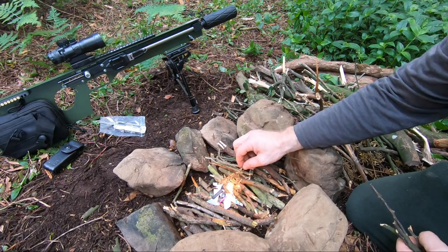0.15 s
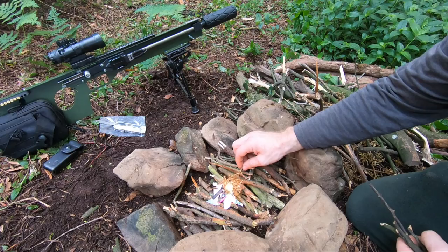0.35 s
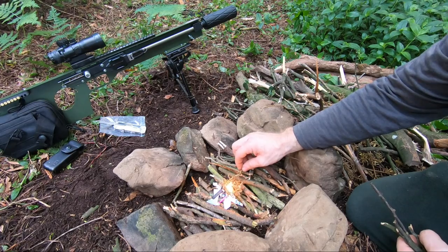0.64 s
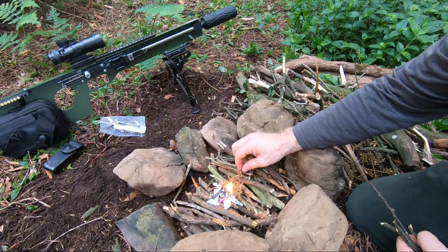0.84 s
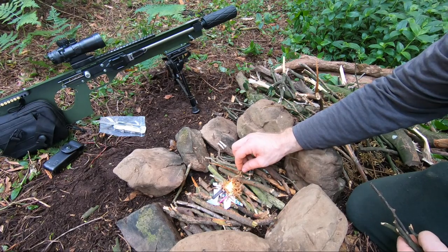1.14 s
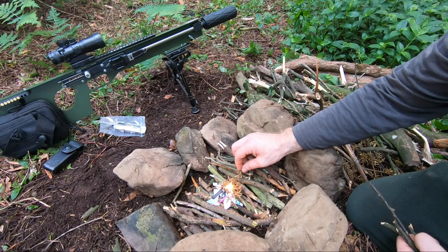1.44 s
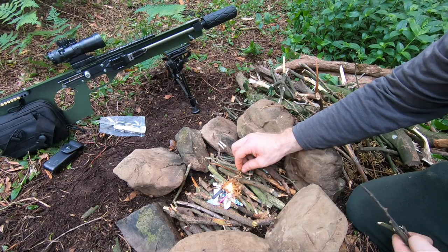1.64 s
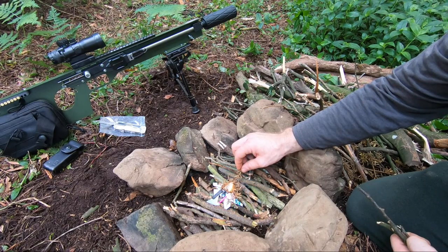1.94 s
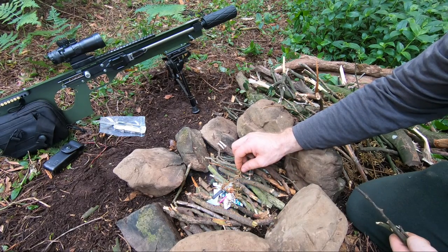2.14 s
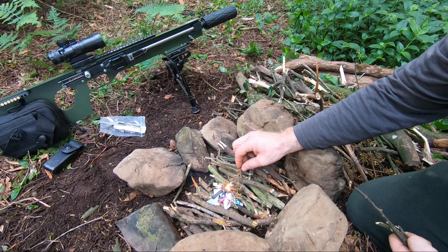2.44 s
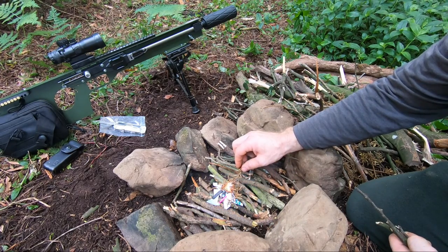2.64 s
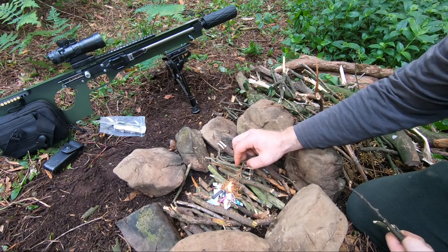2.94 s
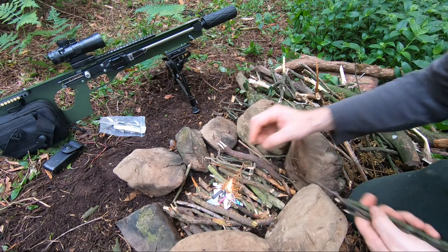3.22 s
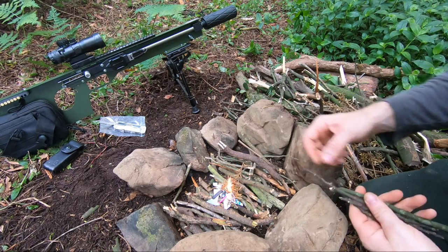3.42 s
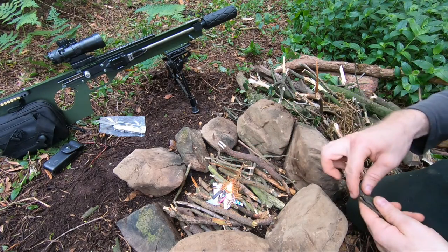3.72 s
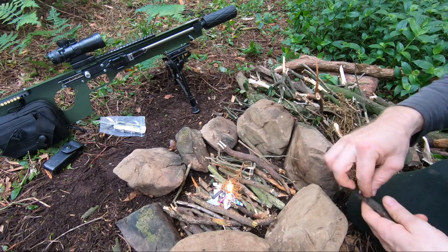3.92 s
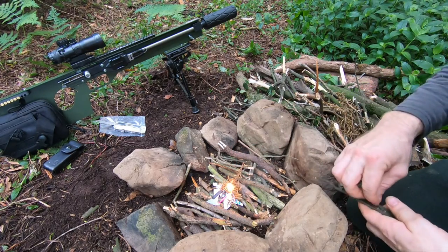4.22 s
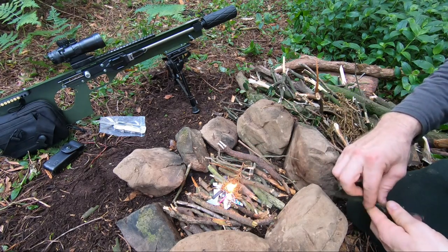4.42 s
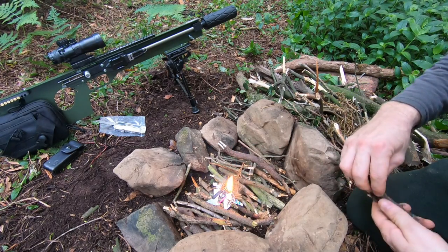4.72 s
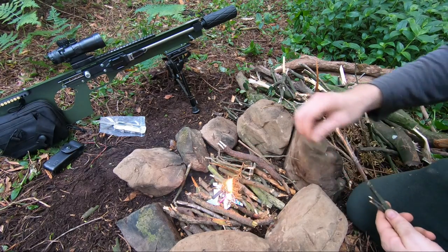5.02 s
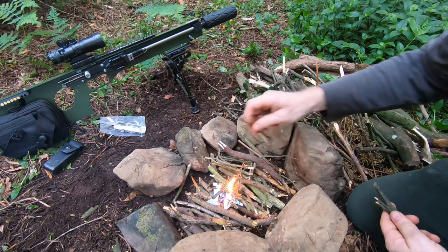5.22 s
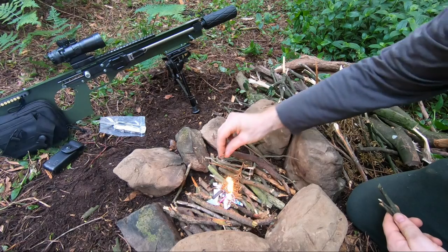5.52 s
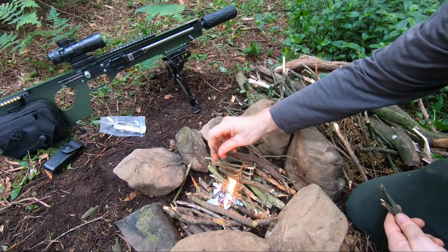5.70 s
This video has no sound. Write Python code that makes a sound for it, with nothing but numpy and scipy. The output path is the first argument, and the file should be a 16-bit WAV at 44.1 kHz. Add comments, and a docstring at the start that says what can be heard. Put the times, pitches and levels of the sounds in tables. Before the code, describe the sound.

In a quiet wood, leaves hush faintly and small birds whistle far off. Near the microphone, a handful of bright, sharp snaps comes from dry kindling at uneven intervals. The cracking then stops, leaving the soft flutter of a small fire, a brief sleeve swish and a few light ticks and rubs as fingers work a twig.

```python
"""A small, freshly lit fire in a ring of stones, close by, among trees.
From the start leaves hush, small birds whistle far off and pockets of gas catch in soft puffs.
From 0.3 to 2.2 s thin dry sticks crack sharply: fibres part, the wood rings, stones scatter the treble.
From 3.3 s two hands handle a twig, with light ticks, bark rustles and the swish of a sleeve,
while the flames, birds and leaves go on."""
import sys
import numpy as np
from scipy import signal
from scipy.fft import rfft, irfft
from scipy.io import wavfile
from scipy.ndimage import uniform_filter1d

SR = 44100
rng = np.random.default_rng(int(sys.argv[2]) if len(sys.argv) > 2 else 0)


def generate_wav(sig):
    """Save sig (samples, or channels by samples) to the path in sys.argv[1] as 16-bit PCM at SR."""
    pcm = np.round(np.clip(np.atleast_2d(sig).T, -1, 1) * 32767).astype(np.int16)
    wavfile.write(sys.argv[1], SR, pcm)


N = 258426
T = np.arange(N) / SR


def undb(db):
    """Decibels to gain."""
    return 10 ** (np.asarray(db) / 20)


def add(out, time_s, x):
    """Mix x into out from time_s."""
    i = max(int(time_s * SR), 0)
    out[i:i + len(x)] += x[:N - i]


def band(x, hz, width_hz):
    """One resonance, gain 1 at its centre; width capped at SR / 4."""
    hz = min(hz, SR * .45)
    return signal.lfilter(*signal.iirpeak(hz, hz / min(width_hz, SR / 4), fs=SR), x)


def reflections(t60_s, size=2048):
    """Dense reflections of unit energy, fading 60 dB in t60_s."""
    tail = rng.standard_normal(size) * np.exp(-np.log(1000) * T[:size] / t60_s)
    return tail / np.sqrt(np.sum(tail ** 2))


def wander(rate_hz):
    """Smooth random wander, spread 1."""
    hold = int(SR / rate_hz)
    steps = np.repeat(rng.standard_normal(N // hold + 2), hold)
    smooth = uniform_filter1d(uniform_filter1d(steps, hold), hold)[:N]
    return smooth / smooth.std()


def swells(rows):
    """Envelope of bell-shaped rises and falls."""
    return sum(undb(db) * np.exp(-2 * ((T - mid_s) / length_s) ** 2) for mid_s, length_s, db in rows)


def resonate(modes, size=2048, low_cut_hz=70):
    """Minimum-phase response of steep resonances whose powers add."""
    f = np.arange(size // 2 + 1) * SR / size
    power = sum(undb(db) ** 2 / (1 + (2 * (f - hz) / width_hz) ** 2) ** 2 for hz, width_hz, db in modes)
    low_cut = (f + 1) ** 2 / (f ** 2 + low_cut_hz ** 2)
    cepstrum = irfft(np.log(power * low_cut) / 2)
    cepstrum[1:size // 2] *= 2
    cepstrum[size // 2 + 1:] = 0
    return irfft(np.exp(rfft(cepstrum)))


def tree_echo(x, t60_s):
    """Trunks and leaves return a diffuse echo."""
    return signal.fftconvolve(x, reflections(t60_s, size=65536))[:N]


# Hush spectrum: (frequency [Hz], relative density [dB])
HUSH_SPECTRUM = [(30, -19.5), (45, -18), (75, -17), (126, -17.5), (200, -19), (370, -25), (600, -27.5),
                 (970, -24), (1200, -25), (1500, -28.5), (3200, -29), (4200, -33.5), (5740, -39),
                 (9000, -42.5), (15500, -44.5)]
def leaves(level_db=-67, breeze_db=.4, flicker_db=.25):
    """Distant leaves swell and flicker gently with the breeze."""
    hz, db = np.transpose(HUSH_SPECTRUM)
    bins_hz = np.maximum(np.arange(N // 2 + 1) * SR / N, 1)
    colour = undb(np.interp(np.log(bins_hz), np.log(hz), db))
    hush = irfft(rfft(rng.standard_normal(N)) * colour, N)
    hush /= np.sqrt(np.mean(colour ** 2 * (bins_hz > 100)))
    swell = undb(breeze_db * wander(1.5) + flicker_db * wander(6))
    return undb(level_db) * (hush + band(hush, 1800, 4000) * (swell - 1))


# Gusts: (centre [s], length [s], level [dB])
GUSTS = [(2.4, .7, -56.5), (3.68, .15, -57)]
def air(steady_db=-60):
    """Slow air presses on the microphone."""
    pressure = band(band(rng.standard_normal(N), 5, 7), 5, 7)
    return (undb(steady_db) + swells(GUSTS)) * pressure / pressure.std()


def whistles(notes, bend):
    """Nearly pure notes that glide, trill and fade in and out."""
    out, waver = np.zeros(N), wander(300)
    for time_s, length_s, start_hz, end_hz, db, trill in notes:
        progress = np.linspace(0, 1, int(length_s * SR))
        glide_hz = start_hz + (end_hz - start_hz) * progress ** bend
        hz = glide_hz * (1 + trill * np.roll(waver, -int(time_s * SR))[:len(progress)])
        fade = np.sqrt(2 * np.abs(np.sin(np.pi * progress)))
        add(out, time_s, undb(db) * fade * np.sin(2 * np.pi * np.cumsum(hz) / SR))
    return out


def chorus_notes(count=40, low_hz=2450, range_hz=1500, gain_db=-81.5):
    """Scraps of song from deep in the wood, at loose intervals."""
    notes = []
    for k, (when, length, pitch, glide) in enumerate(rng.random((count, 4))):
        time_s = (k + when) / count * N / SR
        hz = low_hz + range_hz * pitch
        notes.append((time_s, .06 + .14 * length, hz, hz * (1 + .2 * glide), gain_db, .03))
    return notes


# Far notes: (time [s], length [s], start [Hz], end [Hz], source level [dB], trill depth [ratio])
FAR_NOTES = [(.08, .1, 2250, 2210, -73, .004), (.28, .09, 5520, 5420, -77.5, .004),
             (.60, .11, 3790, 3850, -70.5, .004), (1.08, .28, 3150, 3250, -71.5, .05),
             (1.31, .15, 2290, 2192, -69, .005), (1.79, .13, 2698, 2660, -69.5, .003),
             (2.1, .6, 3400, 2950, -75.5, .07), (4.08, .34, 3943, 2850, -70, .025),
             (4.79, .13, 4240, 4040, -75, .025), (4.88, .25, 3100, 3150, -74.5, .08)]
def far_birds():
    """Far song, mostly tree echo; includes a faint lower note under each upslur of the nearer bird."""
    under = [(time_s + .14, .11, 4700, 4860, -78, .018) for time_s, *_ in NEAR_CALLS]
    song = whistles(FAR_NOTES + under + chorus_notes(), bend=.9)
    return undb(-6.5) * song + undb(-2) * tree_echo(song, t60_s=1.6)


# Calls: (time [s], start [Hz], upslur source level [dB], held note source level [dB])
NEAR_CALLS = [(0.953, 5350, -70.5, -80), (1.972, 5500, -73, -74), (2.855, 5290, -70, -76.5),
              (5.016, 5280, -68.5, -80)]
def nearer_bird(rise_s=.175, pause_s=.05, hold_s=.13, rise_ratio=1.215, end_ratio=1.22, trill=.012):
    """One repeated call: a whistle slides up, breaks off and returns at the top."""
    notes = []
    for time_s, hz, rise_db, hold_db in NEAR_CALLS:
        top_hz = hz * rise_ratio
        notes.append((time_s, rise_s, hz, top_hz, rise_db, trill))
        notes.append((time_s + rise_s + pause_s, hold_s, top_hz, hz * end_ratio, hold_db, trill))
    song = whistles(notes, bend=1.3)
    return undb(-6) * song + undb(-1) * tree_echo(song, t60_s=1.1)


# Sleeve slides: (centre [s], length [s], level [dB])
SLEEVE_SLIDES = [(3.62, 0.31, -75), (4.05, 0.24, -75), (4.165, 0.017, -68)]
def sleeve():
    """Soft cloth slides as the hands work: a dull, uneven swish."""
    cloth = band(band(rng.standard_normal(N), 750, 1000), 750, 1600) * undb(2 * wander(40))
    return swells(SLEEVE_SLIDES) * cloth / cloth.std()


# Finger slides on bark: (centre [s], length [s], level [dB])
BARK_SLIDES = [(3.32, .12, -79.5), (3.71, .05, -78), (3.744, .004, -63), (3.90, .015, -76),
               (4.629, .05, -78), (5.302, .04, -72), (5.77, .06, -76)]
# Brief grainy hiss around the crack at 1.04 s: (centre [s], length [s], level [dB])
CRACK_HISS = [(1.04, .022, -65)]
def bark_and_hiss(rub_s=.035, rub_re_tick_db=-48):
    """Bark rubs under the fingers and around each tick; the same grainy hiss surrounds one crack."""
    rubs = [(time_s, rub_s, db + rub_re_tick_db) for time_s, db, _ in TWIG_TICKS]
    grain = band(rng.standard_normal(N) * undb(3 * wander(900)), 8500, SR / 4)
    return swells(BARK_SLIDES + rubs + CRACK_HISS) * grain / grain.std()


# Clearest flame flaps, the first being the low thump of the crack at 0.343 s: (time [s], gain [dB], pitch [Hz])
FLAME_PUFFS = [(.345, -11, 139), (.586, -21, 240), (1.372, -19, 210), (1.51, -21, 300), (1.733, -6, 190),
               (1.972, -18, 260), (2.335, -16, 250), (2.360, -15.5, 272), (3.229, -19, 227),
               (4.59, -20, 320), (4.635, -20.5, 230), (4.774, -17.5, 290), (5.084, -16, 250),
               (5.430, -16.5, 250), (5.594, -18.5, 260)]
def flames(flutter_count=80, lead_s=.005, flare_delay_s=.011, flare_re_crack_db=-22, flare_hz=290):
    """Soft single pressure cycles: gas pockets catch in puffs, cracks free gas, a faint flutter runs on, and
    the first crack adds a low thump."""
    flares = [(time_s + flare_delay_s, db + flare_re_crack_db, flare_hz)
              for time_s, db, *_ in STICK_CRACKS]
    flutter = [(when * N / SR, -37 + 15 * strength ** 2, 150 + 130 * pitch)
               for when, strength, pitch in rng.random((flutter_count, 3))]
    out, t = np.zeros(N), T[:1024] - lead_s
    for time_s, db, hz in FLAME_PUFFS + flares + flutter:
        flap = -np.pi * hz / SR * np.sin(2 * np.pi * hz * t) * np.exp(-(2.2 * hz * t) ** 2)
        add(out, time_s - lead_s, undb(db) * flap)
    return out


# Heavily damped stick modes: (part, base frequency [Hz], width [Hz], base level [dB])
STICK_MODES = [("thud", 370, 340, 1), ("hollow", 670, 300, -1), ("knock", 1120, 560, -4.5),
               ("knock", 2120, 680, -3), ("ring", 3570, 850, -1.5), ("ring", 4250, 1000, 1),
               ("ring", 5140, 1075, -5), ("splinter", 5370, 900, -14), ("splinter", 7600, 1900, -12),
               ("splinter", 9600, 1400, -14), ("splinter", 11300, 6000, -11.5),
               ("splinter", 13200, 2000, -17.5)]
def stick(pitch, thud_db, hollow_db, knock_db, splinter_db, tilt_db_oct, scatter_db):
    """Fibres part in one sharp push that rings the stick; stones and kindling scatter the treble."""
    part_db = {"thud": thud_db, "hollow": hollow_db, "knock": knock_db, "ring": 0, "splinter": splinter_db}
    modes = []
    for part, hz, width_hz, db in STICK_MODES:
        if part == "splinter":
            db += tilt_db_oct * np.log2(hz / 9000)
        modes.append((hz * pitch if part == "ring" else hz, width_hz, db + part_db[part]))
    snap = resonate(modes)
    # All-passes: bending waves travel at unequal speeds, spreading the front.
    for hz, width_hz in [(600, 1500), (4200 * pitch, 4500), (8000, 1200), (12000, 1200)]:
        snap = snap - 2 * band(snap, hz, width_hz)
    stones = band(reflections(t60_s=.014), 6500, 10000)
    scattered = signal.fftconvolve(snap, stones)[:len(snap)]
    return (snap + undb(scatter_db) * scattered) / np.hypot(1, undb(scatter_db) / 2)


# Twig ticks: (time [s], gain [dB], ring pitch [ratio])
TWIG_TICKS = [(3.7412, -33.5, 1.45), (3.7445, -33, 1.35), (3.9042, -34.5, 1.1), (3.968, -37.5, 1.07),
              (4.7712, -36.5, 1), (5.5704, -38, 1.4), (5.6406, -37, 1.11)]
def twig():
    """The handled twig ticks, ringing like a small crack."""
    out = np.zeros(N)
    for time_s, db, pitch in TWIG_TICKS:
        tick = stick(pitch, thud_db=-6, hollow_db=-12, knock_db=2,
                     splinter_db=-2.5, tilt_db_oct=10, scatter_db=0)
        add(out, time_s, undb(db) * tick)
    return out


# Cracks: (time [s], gain [dB], ring pitch [ratio], thud [dB], hollow [dB], knock [dB],
# splinter [dB], splinter tilt [dB/octave], scatter [dB])
STICK_CRACKS = [(0.3432, 2, 1.2, 0, 4.5, -2.5, -3, -2.5, -4),
                (0.8293, 9.4, 1.08, -7, -7.5, -1.3, 6.6, -7, -6.5),
                (1.0393, -4.7, 0.98, 4.5, 2.5, 4.2, -4.5, 6, -2),
                (1.3300, -22.5, .96, -4, -10, -6, 0.5, 3, -5), (1.734, -32, .82, 11.5, 12, 7, -8, -3, -5.5),
                (1.7885, 1.7, 0.97, -2.8, -3.7, -1.5, -6.5, 15, -4.5),
                (2.1780, 3, .98, 6.5, 6, .7, -6.3, -8, -5)]
def cracks():
    """Each break is a bright snap on a dull thud, faintly echoed by the trees."""
    snaps = np.zeros(N)
    for time_s, db, *colour in STICK_CRACKS:
        add(snaps, time_s, undb(db) * stick(*colour))
    return snaps + undb(-38.5) * tree_echo(snaps, t60_s=.64)


def scene():
    """Nearly centred image with a faint, slight stereo width."""
    close = cracks() + twig() + bark_and_hiss() + sleeve() + flames()
    mono = close + nearer_bird() + far_birds() + leaves() + air()
    side = undb(-36) * signal.fftconvolve(mono, reflections(t60_s=.03))[:N]
    return np.array([mono + side, mono - side])


def record(dry, hiss_db=-85, top_hz=16000):
    """A trace of hiss per channel, then a steep low-pass."""
    hiss = undb(hiss_db) * rng.standard_normal(dry.shape)
    return signal.sosfilt(signal.ellip(8, .2, 70, top_hz, fs=SR, output="sos"), dry + hiss)


dry = scene()
out = record(dry)
generate_wav(out)
```